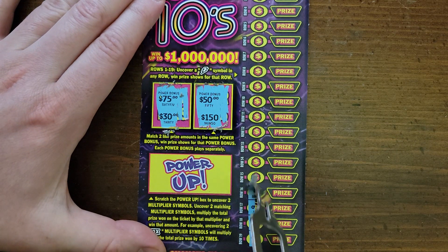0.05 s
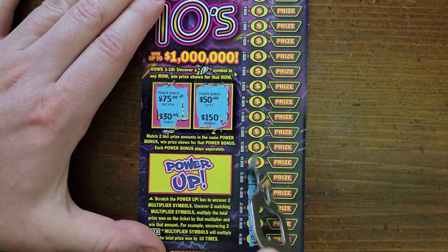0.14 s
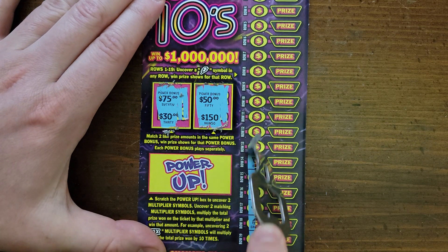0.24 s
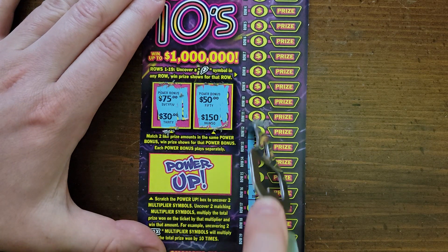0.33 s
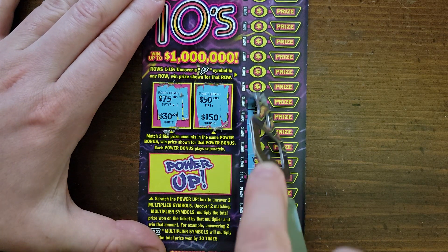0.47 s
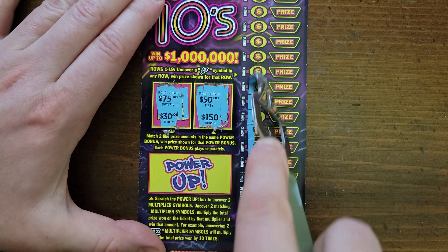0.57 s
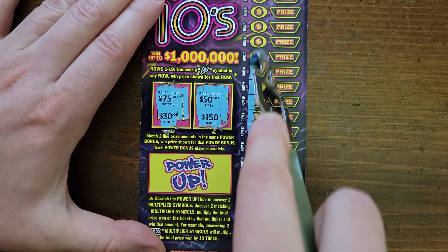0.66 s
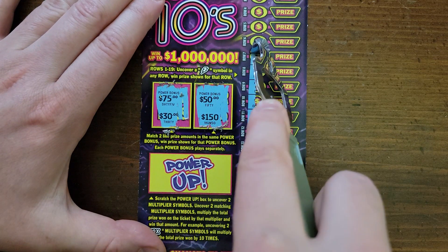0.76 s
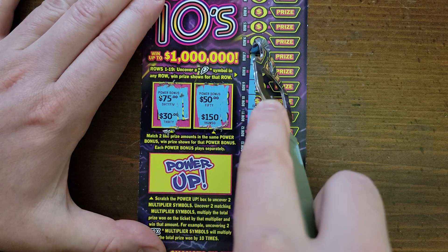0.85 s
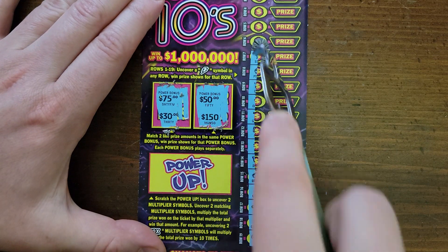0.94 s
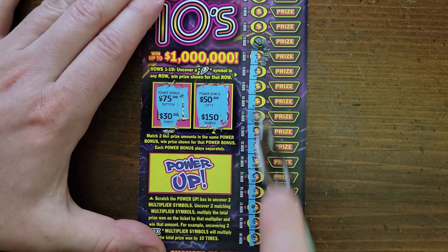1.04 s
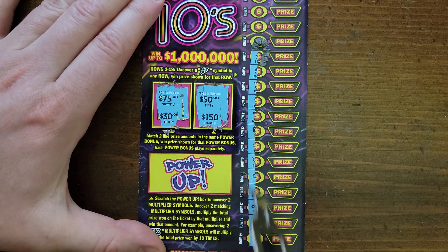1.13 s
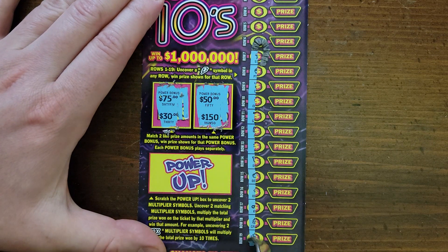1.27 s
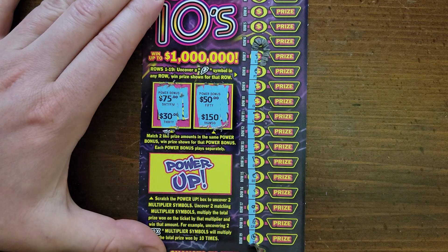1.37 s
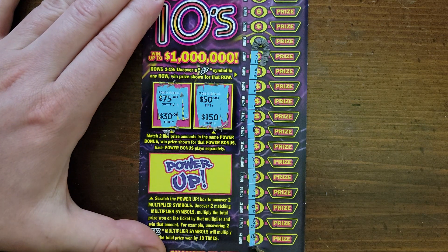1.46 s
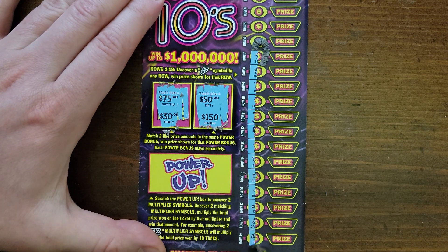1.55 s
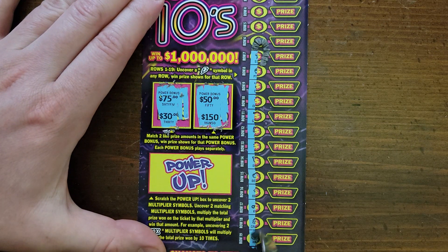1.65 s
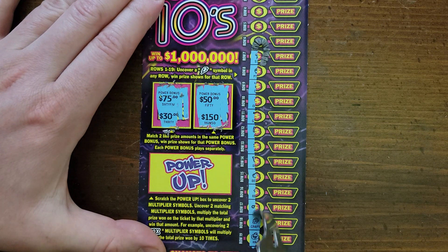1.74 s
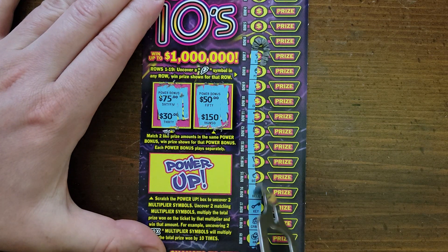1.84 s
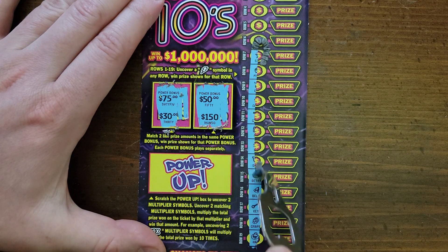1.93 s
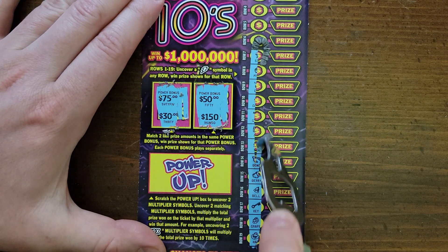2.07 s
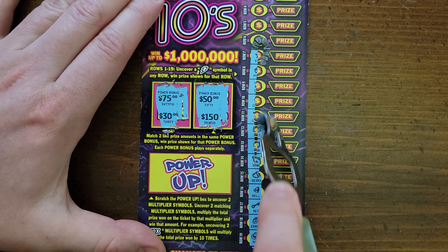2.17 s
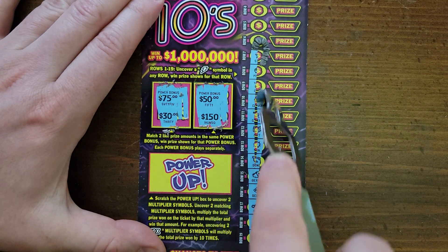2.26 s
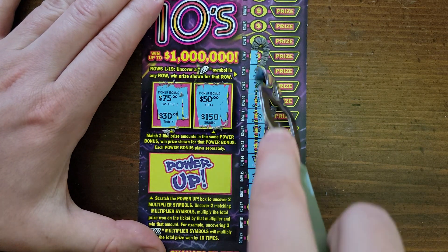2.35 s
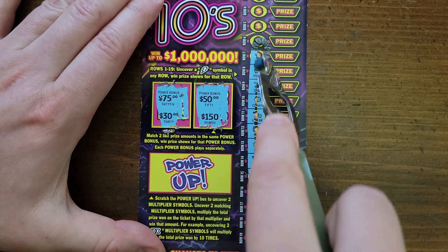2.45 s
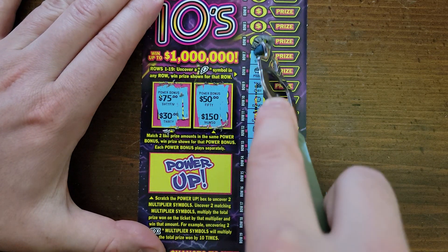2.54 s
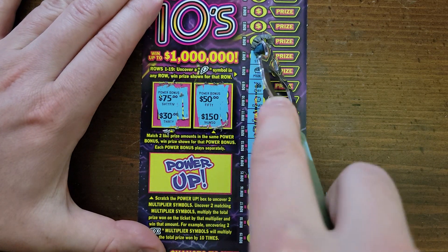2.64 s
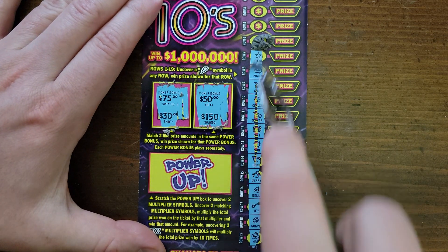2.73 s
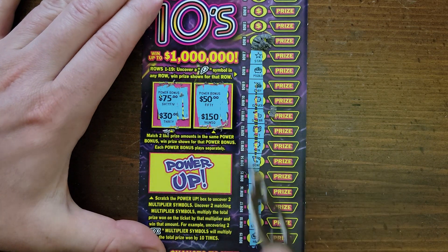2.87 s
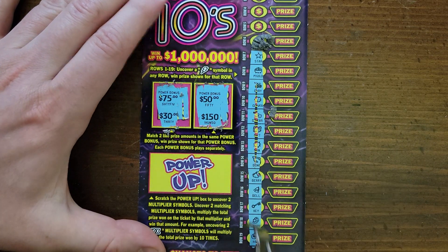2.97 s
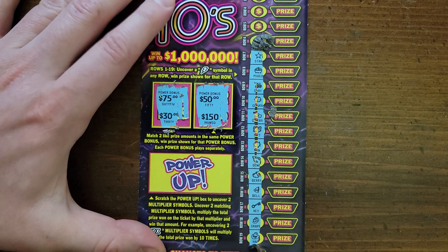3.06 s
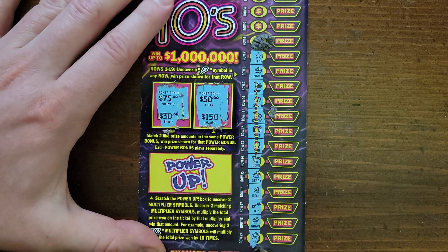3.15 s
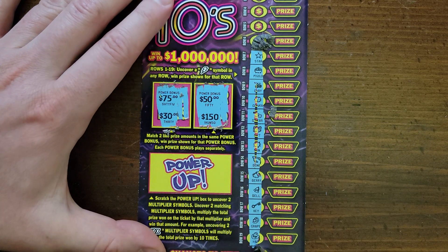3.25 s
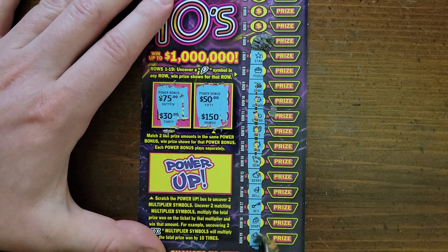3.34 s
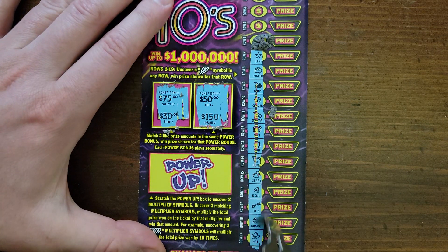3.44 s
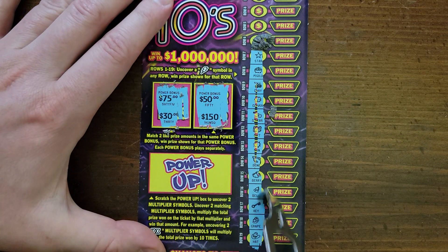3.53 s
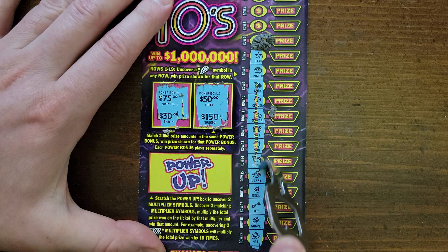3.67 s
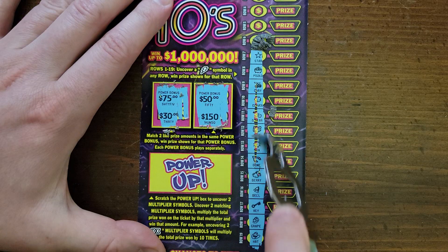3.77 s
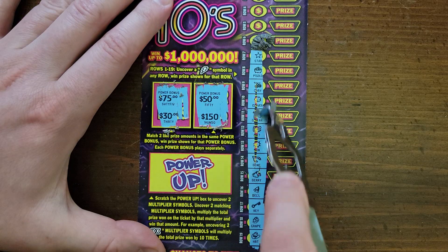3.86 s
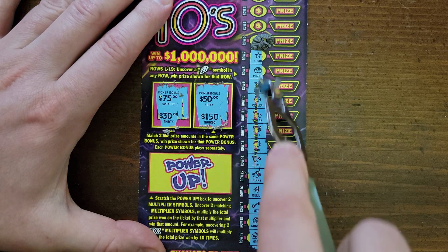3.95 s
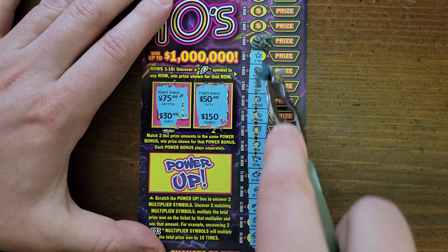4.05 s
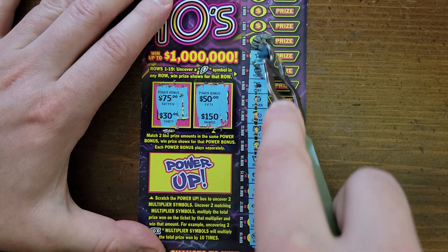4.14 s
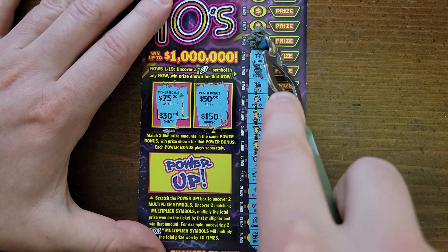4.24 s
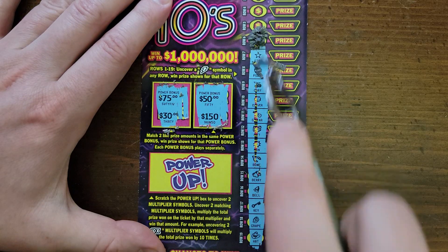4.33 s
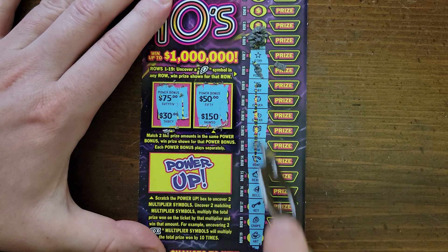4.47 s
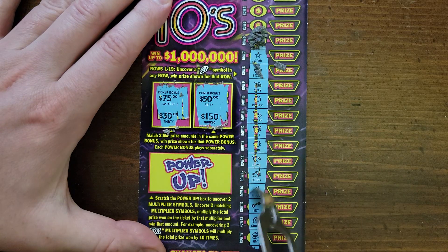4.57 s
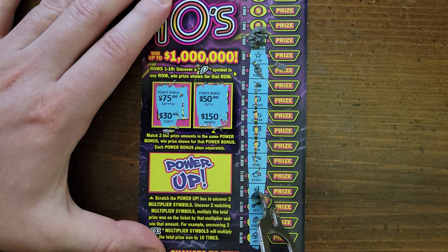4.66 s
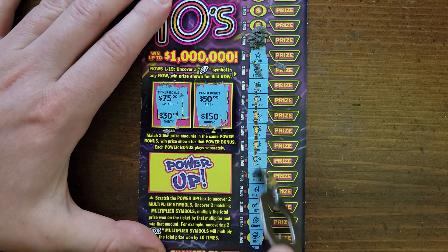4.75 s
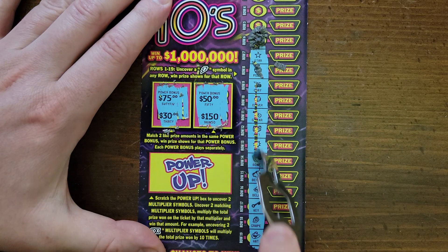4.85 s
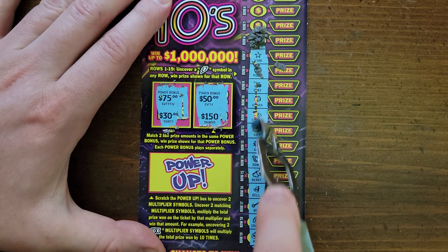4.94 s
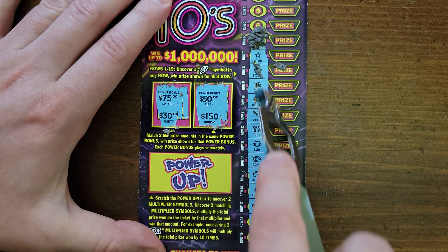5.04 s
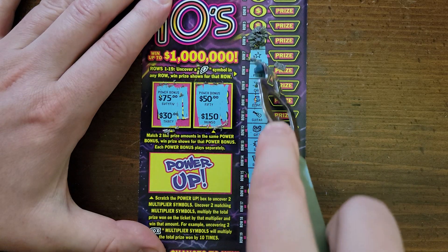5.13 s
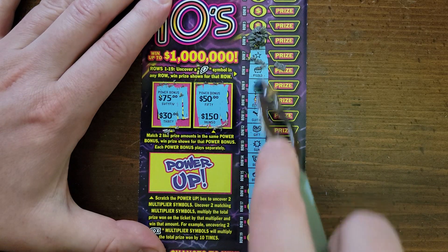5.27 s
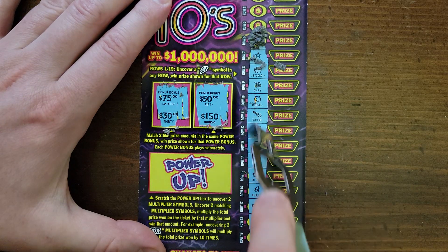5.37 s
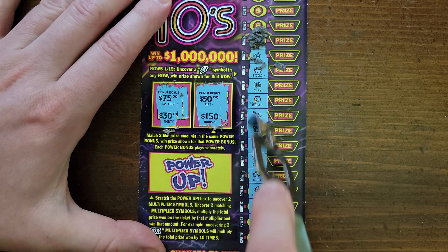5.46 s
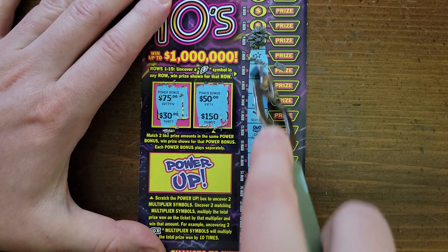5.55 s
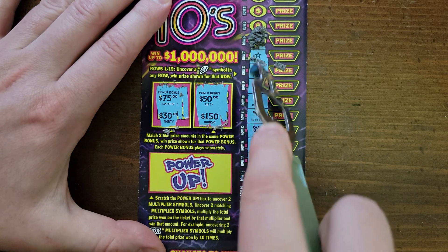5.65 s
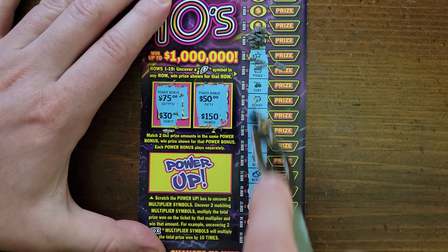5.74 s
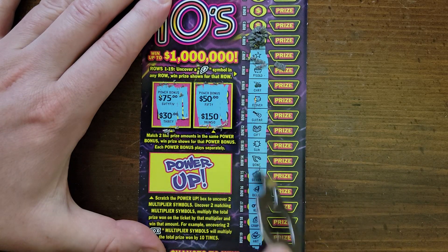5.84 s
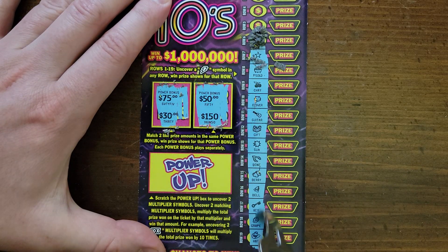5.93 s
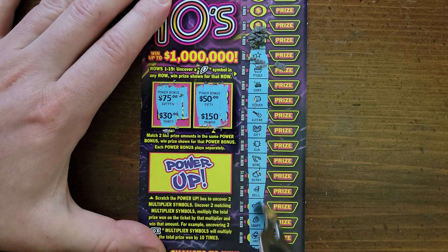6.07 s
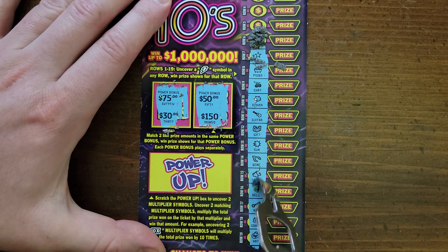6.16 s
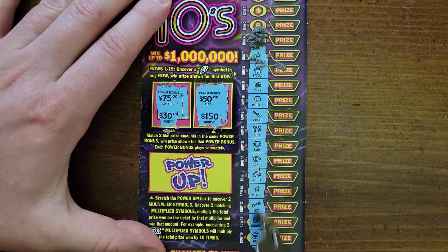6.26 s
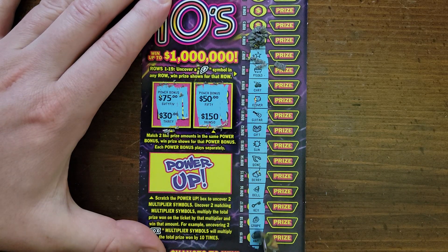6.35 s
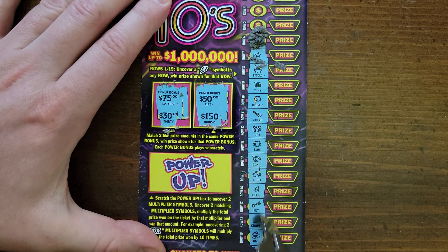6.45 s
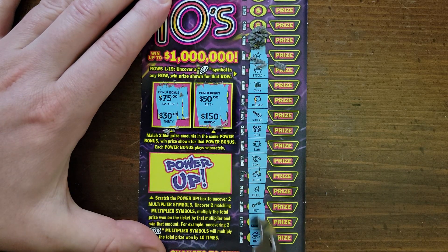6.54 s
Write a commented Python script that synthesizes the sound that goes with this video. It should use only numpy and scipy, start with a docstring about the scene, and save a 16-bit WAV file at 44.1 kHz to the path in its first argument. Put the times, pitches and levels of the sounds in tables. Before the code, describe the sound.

A small metal tool scrapes the coating off a paper ticket on a wooden table, heard close up in stereo. A hard, gritty stroke runs from the start to about 0.8 seconds, with a fine crackle of flakes and a slightly hollow tone from card and table. At 1.3 seconds the tool knocks on the table with a sharp tick. A second long rasp lasts from 1.6 to 2.6 seconds. Small ticks and a softer, duller knock come around 3.0 to 3.1 seconds, followed by a third rasp from 3.3 to 4.3. Another knock at 4.6 seconds leads into a short hard stroke from 4.8 to 5.2. From 5.3 seconds to the end at about 6.6, quick, lighter strokes rub the bared card, growing smoother and softer. A faint electrical hum and low rumble fill the small room throughout.

```python
"""A small metal tool scrapes the coating off a paper ticket on a wooden table, close up, in stereo.
Mains hum and low rumble fill the small room throughout. First come four hard strokes: tiny slips of
the edge rasp, shed flakes and drive card and table. In each gap (1.3, 3.1, 4.6 s) the tool knocks on
the table and ticks against the card. From 5.3 s, short light strokes rub the bared card."""
import sys
import numpy as np
from scipy import signal
from scipy.fft import rfft, irfft
from scipy.io import wavfile
from scipy.ndimage import uniform_filter1d

SR = 44100
rng = np.random.default_rng(int(sys.argv[2]) if len(sys.argv) > 2 else 0)


def generate_wav(signal):
    """Clip the signal to [-1, 1] and save it as 16-bit WAV at the path in sys.argv[1]."""
    frames = np.transpose(np.atleast_2d(signal))
    scaled = np.clip(frames, -1, 1) * 32767
    pcm = np.round(scaled).astype(np.int16)
    wavfile.write(sys.argv[1], SR, pcm)


N = 291060
TIME = np.arange(N) / SR

# room noise spectrum: (frequency [Hz], relative level [dB])
AIR_SPECTRUM = [(15, -21), (36, -1), (60, -5), (88, -10), (125, -7.5), (160, -17.5), (220, -14), (420, -25),
                (1000, -36.5), (2000, -47), (5200, -57), (7400, -57.5), (8300, -71.5), (15000, -59)]
# room noise, left against right: (frequency [Hz], correlation [0-1])
AIR_CORRELATION = [(30, 0.67), (130, 1), (260, 0.77), (600, 0), (8000, 0.01)]
# hum partials: (frequency [Hz], level [dB])
HUM_PARTIALS = [(59.2, -51), (118.4, -64.5), (131, -60.5), (221.5, -62.5), (296, -77.5), (355.3, -68)]
# room decay: (frequency [Hz], T60 [s])
ROOM_DECAY = [(150, 0.19), (500, 0.39), (1400, 0.28), (4000, 0.21), (14000, 0.14)]
# hand leaning on the table through the tool: (peak time [s], level [dB], length [s], band [Hz])
HAND_PUSHES = [(1.621, -47, 0.089, 554), (3.334, -44, 0.11, 580), (3.707, -62, 0.15, 75),
               (3.988, -38, 0.088, 73), (4.785, -50, 0.17, 470), (5.55, -48.5, 0.25, 536),
               (5.565, -39.5, 0.11, 138), (5.773, -50, 0.42, 144), (6.108, -47, 0.18, 565)]
# edge catching on the card: (time [s], relative level [dB], decay [s], band [Hz])
EDGE_TICKS = [(1.3122, -35, 0.002, 6840), (2.986, -46, 0.0066, 2410), (3.0014, -31.5, 0.0024, 1790),
              (3.0932, -44, 0.0016, 6000), (3.101, -49, 0.00038, 6000), (4.6146, -40.5, 0.0019, 7200)]
# tool set down: (time [s], relative level [dB], low-pass corner [Hz])
TOOL_KNOCKS = [(1.3113, 4.5, 2230), (3.096, -2.5, 586), (4.6135, 2.5, 1640)]
# knock arrival, left then right: (delay [s], gain [dB])
KNOCK_PATHS = [(0, 0.5), (0.00036, -0.5)]
# main table modes: (frequency [Hz], relative level [dB], T60 [s])
TABLE_MODES = [(126.8, -14, 0.25), (203.7, -11.5, 0.31), (344, -9.5, 0.13), (437, -5, 0.098),
               (484, 7, 0.025), (540, -1, 0.13), (692, -2, 0.1), (815, 0, 0.099), (890, 10.5, 0.0108),
               (1078, 12, 0.049), (1252, 4, 0.053), (1630, -25.5, 0.29), (1760, 7, 0.017), (2110, 2, 0.021),
               (2950, -3.5, 0.027)]
# dense table modes: (frequency [Hz], relative level [dB])
THUD_SPECTRUM = [(60, -25), (130, -1), (300, 12), (500, 5.5), (1150, 2), (1700, -4), (2400, -9), (3100, -1),
                 (3800, -8), (8000, -11)]
# their decay: (frequency [Hz], T60 [s])
THUD_DECAY = [(150, 0.31), (600, 0.11), (1600, 0.21), (3000, 0.16), (5000, 0.09)]
# card and table resonances: (frequency [Hz], width [Hz], near-end lift [dB], far-end lift [dB])
CARD_RESONANCES = [(358, 31, 12.5, 5.5), (441.4, 9, 20.5, -1), (543, 87, 5.5, 10), (683, 50, 11.5, 1),
                   (793.6, 101, 11, 7), (850, 60, 7, -5), (1041.5, 60, 6.5, 14), (1140, 173, 11, -9),
                   (1230, 74, -1, 16.5), (1416, 75, 6, 4), (1740, 220, 2.5, 6), (2066, 110, 3, -12.5),
                   (2330, 110, -8, 0.5), (2777, 100, 1.5, 11), (2750, 140, 1, 0), (3470, 170, 7.5, -3),
                   (3800, 300, -4, 4), (5240, 280, 7, 7), (6240, 680, 9, -1), (8830, 1100, 10, 3),
                   (9750, 780, 8.5, 9), (12170, 490, -9.5, 16), (14100, 730, 10.5, 5.5)]
# friction spectra: (frequency [Hz], relative level [dB])
PRESSED_SPECTRUM = [(60, -33), (130, 4.5), (280, -16.5), (430, -9.5), (550, -15), (690, -14), (900, -1),
                    (1150, -2), (1550, 0), (1900, -0.5), (2300, -7.5), (3000, -38), (6000, -96)]
GLIDING_SPECTRUM = [(60, -24.5), (130, 13), (260, 2.5), (520, 1.5), (700, 0.5), (1100, 1), (1350, -4.5),
                    (1950, -4.5), (2400, -11), (3200, -15.5), (6000, -64)]
RASP_SPECTRUM = [(900, -48.5), (2100, 2), (2400, -1.5), (2800, 2), (3300, 0.5), (3900, -1), (4500, -9),
                 (5800, -11), (6800, -19), (8200, -32), (9600, -28), (11000, -24.5), (16000, -46)]
FLAKE_SPECTRUM = [(2500, 9.5), (5000, 3), (7000, 5), (8300, -6.5), (9200, -4), (10000, -2.5), (10900, -8.5),
                  (12300, -2.5), (13300, 1.5), (14800, -5.5), (15800, 4)]
# tool along the ticket: (time [s], place [0 near, 1 far])
TOOL_PATH = [(0, 0.13), (.8, 0.98), (1.5, 0.19), (2, 0.4), (2.55, 0.91), (3.25, 0.2), (4.25, 0.93),
             (4.7, 0.11), (5.25, 0.92), (6.1, 0.13), (6.6, 0.2)]
# hard strokes, one curve each: (time [s], relative edge bite [dB], relative table drag [dB])
HARD_STROKES = [
    [(0.0, -45.5, -38.5), (0.066, -45, -47), (0.16, -47.5, -47), (0.186, -46, -45.5), (0.475, -40.5, -42.5),
     (0.514, -42, -42), (0.706, -42, -38.5), (0.774, -53.5, -46), (0.83, -103, -77)],
    [(1.58, -89, -85), (1.602, -60, -80), (1.654, -46, -48), (1.704, -50, -48.5), (1.756, -44, -46.5),
     (1.91, -42.5, -44), (1.958, -56, -55), (1.996, -46.5, -42.5), (2.194, -43, -45.5), (2.414, -44, -41.5),
     (2.57, -54.5, -47.5), (2.62, -98, -78)],
    [(3.285, -94, -91), (3.309, -61, -67), (3.337, -48, -68), (3.381, -51.5, -47.5), (3.433, -47, -49.5),
     (3.549, -45.5, -47.5), (3.725, -46, -44.5), (3.835, -45.5, -50), (4.073, -43, -40),
     (4.217, -51.5, -44.5), (4.28, -94, -74)],
    [(4.82, -62.5, -55.5), (4.895, -46, -49), (5.01, -45.5, -55), (5.122, -57, -55), (5.18, -99, -63)],
]
# ease of flaking, one per hard stroke: (offset to bite [dB])
STROKE_FLAKING_DB = [-21, -19, -17.5, -14.5]
# light passes, relative levels:
# (peak time [s], length [s], drag [dB], bite [dB], flaking [dB], squeal [dB])
LIGHT_RUBS = [(2.697, 0.034, -83, -88, -86, -78), (4.8, 0.1, -51.5, -53.5, -69, -103),
              (5.162, .025, -76, -77, -76.5, -78), (5.306, 0.037, -66, -55, -68, -58),
              (5.324, 0.052, -55, -49.5, -59.5, -65), (5.344, 0.21, -55, -60, -76, -74),
              (5.55, 0.21, -52.5, -52, -77, -74), (5.585, 0.037, -48, -53.5, -79.5, -63),
              (5.769, 0.25, -53, -54.5, -80, -69), (5.841, 0.022, -64, -50, -72, -80),
              (5.865, 0.091, -48, -54, -74, -90), (5.88, 0.36, -52, -61.5, -84, -83),
              (6.117, 0.16, -54, -56.5, -88, -89), (6.301, 0.18, -53.5, -61.5, -98, -85),
              (6.447, 0.16, -52.5, -68.5, -110, -98), (6.61, 0.24, -54.5, -62.5, -94, -82)]
# resonant swells: (peak time [s], length [s], relative level [dB], frequency [Hz])
EDGE_SQUEAKS = [(0.222, 0.17, -50.5, 6310), (2.007, 0.047, -50.5, 6470)]  # edge breaks into fresh coating
HOLLOW_RINGS = [(0.061, 1, -44.5, 1120), (0.345, 0.55, -60, 1135), (1.675, 0.16, -44.5, 1045),
                (1.784, 0.48, -44, 1150), (3.336, 0.075, -44.5, 1104), (3.454, 0.19, -40.5, 1089),
                (3.631, 0.074, -38.5, 1054)]  # loose near end of the ticket
EDGE_CHATTERS = [(0.21, 0.1, -43, 3080), (0.31, 0.24, -42, 3070), (0.44, 0.13, -42, 3350),
                 (0.62, 0.24, -49.5, 3980), (1.808, 0.32, -53, 3550), (2.025, 0.098, -42.5, 2950),
                 (2.17, 0.23, -40.5, 3020), (2.29, 0.3, -43.5, 3190), (2.41, 0.13, -46.5, 3570),
                 (3.698, 0.35, -51, 3800), (4.073, 0.46, -64, 2660), (4.933, 0.24, -51.5, 3600),
                 (6.304, 0.054, -49, 1890)]  # edge digs in


def amp(db):
    """Decibels to gain."""
    return 10 ** (np.asarray(db) / 20)


def lookup(points, hz):
    """Interpolate (frequency [Hz], value) on a log axis."""
    point_hz, value = np.transpose(points)
    return np.interp(np.log(hz + 1), np.log(point_hz + 1), value)


def add(mix, time_s, sound):
    """Mix a sound in at time_s."""
    part = mix[round(time_s * SR):][:len(sound)]
    part += sound[:len(part)]


def unit_rms(x, band_hz=(0, SR)):
    """Scale to rms 1 within a band."""
    hz = np.fft.rfftfreq(x.shape[-1], 1 / SR)
    inside = irfft(rfft(x) * ((hz >= band_hz[0]) & (hz <= band_hz[1])))
    return x / np.sqrt(np.mean(inside ** 2) + 1e-20)


def drift(corner_hz):
    """Low-passed noise, rms 1."""
    hz = np.fft.rfftfreq(N, 1 / SR)
    return unit_rms(irfft(rfft(rng.standard_normal(N)) / (1 + (hz / corner_hz) ** 4), N))


def swell(peak_s, length_s):
    """Half-cosine envelope."""
    return np.cos(np.pi * np.clip((TIME - peak_s) / length_s, -.5, .5))


def convolve(x, response):
    """Convolve, cut to scene length."""
    return signal.oaconvolve(np.atleast_2d(x), np.atleast_2d(response), axes=1)[:, :N]


def diffuse(decay, rise_s, spectrum=None):
    """Dense-mode response, energy 1 per ear; each band has its own T60."""
    hz, t, bins = signal.stft(rng.standard_normal((2, SR // 2)), SR, nperseg=256)
    bins *= amp(-60 * t / lookup(decay, hz)[:, None]) * (1 - np.exp(-t / rise_s))
    if spectrum:
        bins *= amp(lookup(spectrum, hz))[:, None]
    tail = signal.istft(bins, SR, nperseg=256)[1]
    return tail / np.linalg.norm(tail, axis=1, keepdims=True)


def background():
    """Rumble, correlated between ears in the bass, plus wavering mains hum."""
    hz = np.fft.rfftfreq(N, 1 / SR)
    left, independent = rfft(rng.standard_normal((2, N)))
    correlation = lookup(AIR_CORRELATION, hz)
    right = correlation * left + np.sqrt(1 - correlation ** 2) * independent
    air = irfft(np.array([left, right]) * amp(lookup(AIR_SPECTRUM, hz)), N)
    hum = sum(amp(db + 3.8 * drift(13.0)) * np.sin(2 * np.pi * hum_hz * TIME + 0.93 * drift(0.65))
              for hum_hz, db in HUM_PARTIALS)
    return amp(-57) * unit_rms(air, band_hz=(20, 50)) + hum


def room(x):
    """Diffuse tail; treble dies first."""
    return convolve(x, diffuse(ROOM_DECAY, rise_s=0.0027))


def early_echoes(x, echo_db, fade_s, count=14):
    """Direct sound plus echoes off hands and nearby objects, per ear; bass bends round them."""
    response = np.zeros((2, SR // 40))
    highpass = signal.butter(2, 330, "highpass", fs=SR)
    for ear in response:
        delays = rng.integers(SR // 4000, SR // 70, count)
        echoes = rng.choice([-1, 1], count) * np.exp(-delays / SR / fade_s)
        ear[delays] = amp(echo_db) * echoes / np.linalg.norm(echoes)
        ear[:] = signal.lfilter(*highpass, ear)
        ear[rng.integers(0, SR // 1200)] += 1  # direct path
    return convolve(np.array([x, x]), response / np.linalg.norm(response, axis=1, keepdims=True))


def moving_echoes(x, place, count=9):
    """Echo patterns crossfade as the tool moves along the ticket."""
    fades = (np.cos(np.pi / 2 * np.clip(place * (count - 1) - k, -1, 1)) for k in range(count))
    return sum(fade * early_echoes(x, echo_db=8.0, fade_s=0.0081) for fade in fades)


def pushes():
    """Dull swells of the table top as the hand bears down."""
    out = np.zeros(N)
    for peak_s, level_db, length_s, hz in HAND_PUSHES:
        band = signal.butter(2, [hz / 1.6, hz * 1.18], "bandpass", fs=SR, output="sos")
        noise = unit_rms(signal.sosfilt(band, rng.standard_normal(N)))
        out += amp(level_db) * swell(peak_s, length_s) * noise
    return early_echoes(out, echo_db=0.0, fade_s=0.026)


def ticks():
    """Short broadband snaps of the edge on the card."""
    out, t = np.zeros(N), np.arange(SR // 10) / SR
    for time_s, level_db, decay_s, hz in EDGE_TICKS:
        band = signal.butter(1, [hz / 3, hz * 1.86], "bandpass", fs=SR)
        fade = np.exp(-t / decay_s)
        snap = signal.lfilter(*band, rng.standard_normal(len(t)) * fade * (1 - fade))
        add(out, time_s, amp(level_db + 13.5) * snap / np.linalg.norm(snap))
    return early_echoes(out, echo_db=-24.0, fade_s=0.03, count=40)


def knocks():
    """A blow rings the table's main modes, then its dense ones; soft blows lack treble."""
    out, t = np.zeros((2, N)), np.arange(SR // 2) / SR
    modes = sum(amp(db - 60 * t / t60_s) * np.sin(2 * np.pi * hz * t + np.pi * k)
                for k, (hz, db, t60_s) in enumerate(TABLE_MODES))
    thud = diffuse(THUD_DECAY, rise_s=0.004, spectrum=THUD_SPECTRUM)[:, :len(t)]
    rings = modes / np.linalg.norm(modes) + amp(-4.5) * thud
    for time_s, level_db, corner_hz in TOOL_KNOCKS:
        lowpass = signal.butter(3, corner_hz, fs=SR)
        for ear, ring, (delay_s, ear_db) in zip(out, rings, KNOCK_PATHS):
            add(ear, time_s + delay_s, amp(level_db + ear_db - 1.5) * signal.lfilter(*lowpass, ring))
    return out


def ringing(x, hz, width_hz):
    """Two cascaded resonators tracking hz; output rms 1."""
    carrier = np.exp(2j * np.pi * np.cumsum(hz * np.ones(N)) / SR)
    pole = np.exp(-np.pi * width_hz / SR)
    for _ in range(2):
        x = 2 * (carrier * signal.lfilter([1 - pole], [1, -pole], x / carrier)).real
    return unit_rms(x)


def singing(x, swells, width_hz):
    """One resonance that swells and glides in pitch from peak to peak."""
    power = sum(amp(db) ** 2 * swell(peak_s, length_s) ** 2 for peak_s, length_s, db, _ in swells)
    peaks_s, _, _, hz = np.transpose(swells)
    return np.sqrt(power) * ringing(x, np.interp(TIME, peaks_s, hz), width_hz)


def card(x, spectrum, place, unit_band_hz):
    """Friction spectrum plus card and table resonances that vary with place; rms 1 in the band."""
    hz, out = abs(np.fft.fftfreq(8192, 1 / SR)), 0
    for end, share in enumerate((1 - place, place)):
        resonance_db = sum(lifts_db[end] / (1 + (2 * (hz - centre_hz) / width_hz) ** 2)
                           for centre_hz, width_hz, *lifts_db in CARD_RESONANCES)
        log_gain = np.log(amp(lookup(spectrum, hz) + resonance_db))
        response = np.fft.ifft(np.exp(np.conj(signal.hilbert(log_gain)))).real  # minimum phase
        out = out + share * convolve(x, response[:len(hz) // 2])
    return unit_rms(out, unit_band_hz)


def flake_patches(x, depth_db=2.5, patch_hz=700, patch_s=0.07):
    """No two flakes are alike: level wanders over time and frequency."""
    hz, t, bins = signal.stft(x, SR, nperseg=512)
    field = uniform_filter1d(rng.standard_normal(bins.shape[1:]), round(patch_hz / hz[1]), axis=0)
    field = uniform_filter1d(field, round(patch_s / t[1]), axis=1)
    return signal.istft(bins * amp(depth_db * field / field.std()), SR, nperseg=512)[1][:, :N]


def slips(rate_hz, spread_db, clump_db):
    """Tiny slips of the edge: random impulses of unequal size, bunched by chatter."""
    size = amp(spread_db * np.minimum(rng.exponential(1, N), 4)) * rng.choice([-1, 1], N)
    fires = rng.random(N) < rate_hz / SR
    return size * fires * amp(clump_db * drift(116))


def stroke_gains(place, far_flaking_db=1.5, flake_onset_db=-53):
    """Drag, bite, flaking, squeal. Hard strokes flake with bite; in rubs all four follow speed."""
    gains = np.zeros((4, N))
    for stroke, flaking_db in zip(HARD_STROKES, STROKE_FLAKING_DB):
        times_s, bite_db, drag_db = np.transpose(stroke)
        bite, drag = amp(np.interp(TIME, times_s, bite_db)), amp(np.interp(TIME, times_s, drag_db))
        flaking = bite * amp(flaking_db + far_flaking_db * place) * np.tanh(bite / amp(flake_onset_db))
        active = (TIME >= times_s[0]) & (TIME <= times_s[-1])
        gains[:3] += np.array([drag, bite, flaking]) * active
    for peak_s, length_s, drag_db, bite_db, flaking_db, squeal_db in LIGHT_RUBS:
        active = abs(TIME - peak_s) < length_s / 2
        speed = swell(peak_s, length_s)[active] ** 2
        rub = [amp(drag_db) * speed ** 0.86, amp(bite_db) * speed ** 1.23,
               amp(flaking_db) * speed ** 5.5, amp(squeal_db) * speed]
        gains[:, active] = np.maximum(gains[:, active], rub)
    return gains


def scraping():
    """One slip stream drives table and rasping edge; the coating breaks off in finer grains."""
    place = np.interp(TIME, *np.transpose(TOOL_PATH))
    drag, bite, flaking, squealing = stroke_gains(place)
    grip = amp(0.5 * drift(5.4) + 1.3 * drift(450))  # coating holds unevenly, lets go in jerks
    edge = moving_echoes(grip * slips(rate_hz=6000, spread_db=2.5, clump_db=-0.18), place)
    crumbs = moving_echoes(grip * slips(rate_hz=6000, spread_db=-2.0, clump_db=2.5), place)
    shudder = early_echoes(slips(rate_hz=4400, spread_db=-1.7, clump_db=2.0), echo_db=1.5, fade_s=0.0012)
    grit = early_echoes(slips(rate_hz=1200, spread_db=0.0, clump_db=2.0), echo_db=-1.0, fade_s=0.0038)

    dig = 1 / (1 + (amp(-49.0) / (bite + 1e-9)) ** 2)  # 1 dug in, 0 gliding on bare card
    pressed = card(edge, PRESSED_SPECTRUM, place, unit_band_hz=(600, 2000))
    gliding = card(edge, GLIDING_SPECTRUM, place, unit_band_hz=(600, 2000))
    body = drag * (amp(3.0) * dig * pressed + amp(2.5) * (1 - dig) * gliding)
    rasp = amp(-1.5) * bite * card(edge, RASP_SPECTRUM, place, unit_band_hz=(2400, 5000))
    grains = flake_patches(unit_rms(crumbs) + 0.89 * unit_rms(grit))
    flakes = amp(3.0) * flaking * card(grains, FLAKE_SPECTRUM, place, unit_band_hz=(11800, 15500))

    squeak = singing(crumbs, EDGE_SQUEAKS, width_hz=340)
    hollow = singing(shudder, HOLLOW_RINGS, width_hz=185)
    chatter = singing(edge, EDGE_CHATTERS, width_hz=1000)
    squeal = squealing * ringing(crumbs, hz=10020, width_hz=260)
    pan_left, pan_right = amp([[1.1], [-1.1]]), amp([[-.7], [.7]])
    return (body + hollow) * pan_left + (rasp + chatter + flakes + squeak + squeal) * pan_right


def scene():
    """Tool sounds and their room tail over rumble and hum."""
    strokes, blows, snaps = scraping(), knocks(), ticks()
    direct = strokes + pushes() + blows + snaps
    room_send = amp(-10.5) * strokes + amp(-13.5) * blows + amp(-12.5) * snaps
    return direct + room(room_send) + background()


def record(dry):
    """Band limit at 15850 Hz."""
    lowpass = signal.firwin(511, 15850, window=("kaiser", 9), fs=SR)
    return signal.oaconvolve(dry, lowpass[None], "same")


dry = scene()
out = record(dry)
generate_wav(out)
```